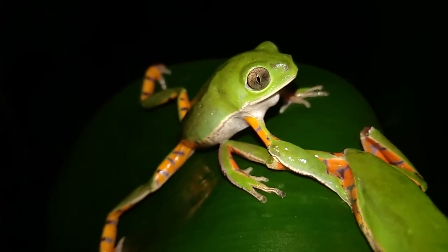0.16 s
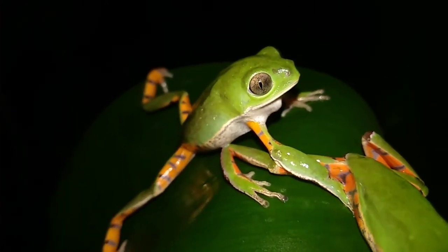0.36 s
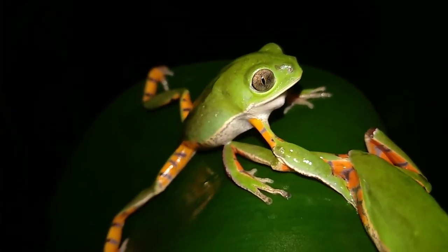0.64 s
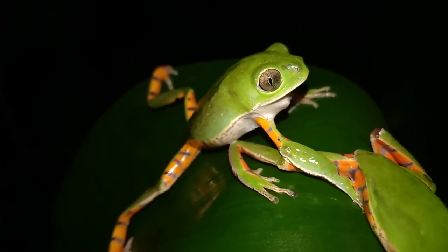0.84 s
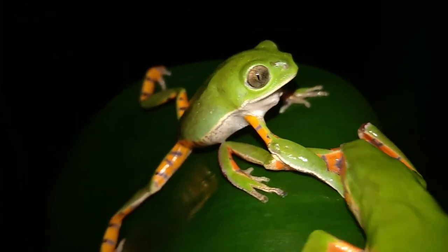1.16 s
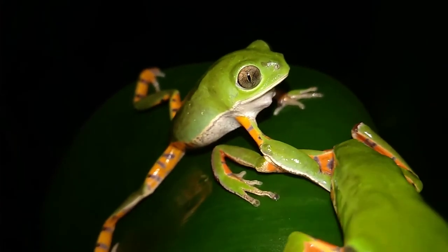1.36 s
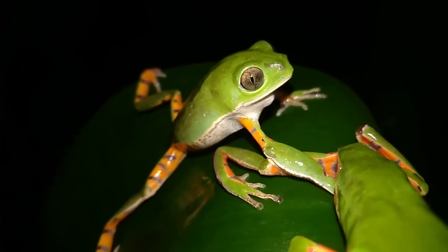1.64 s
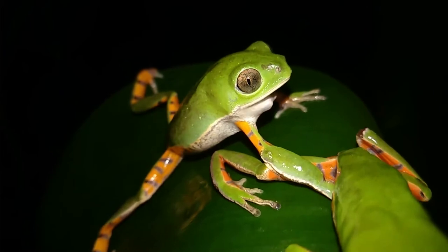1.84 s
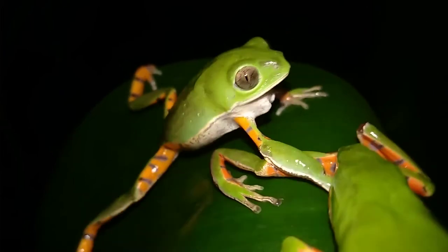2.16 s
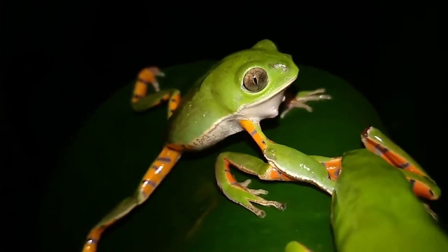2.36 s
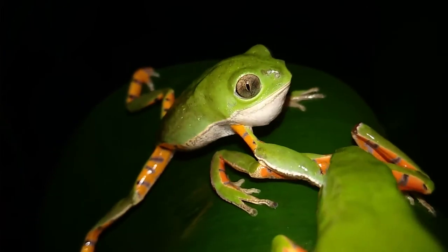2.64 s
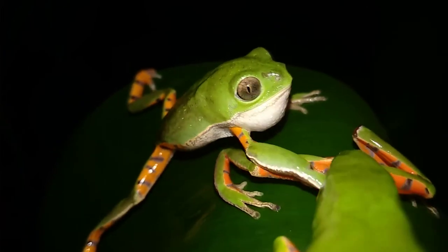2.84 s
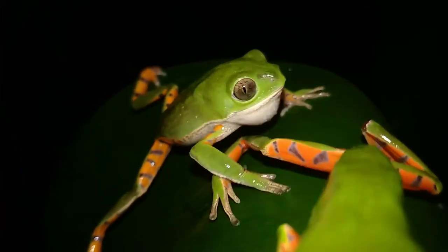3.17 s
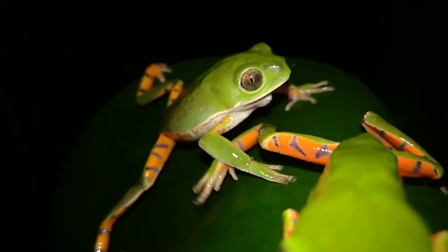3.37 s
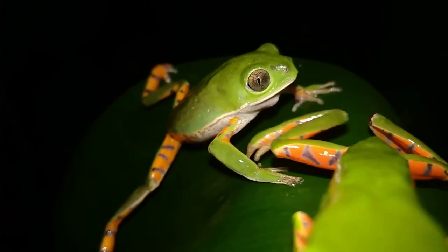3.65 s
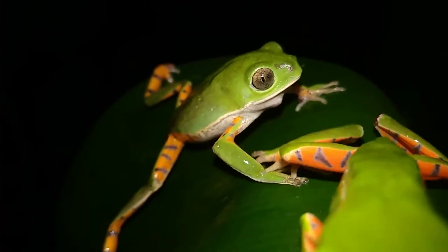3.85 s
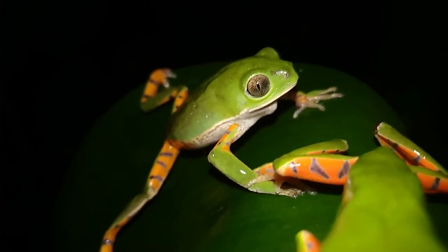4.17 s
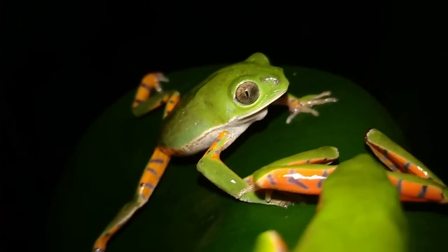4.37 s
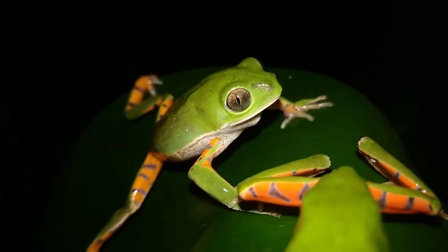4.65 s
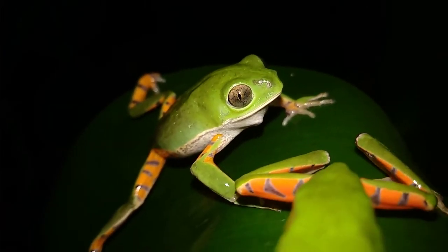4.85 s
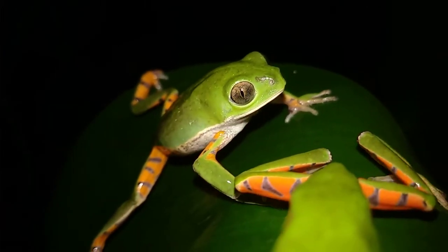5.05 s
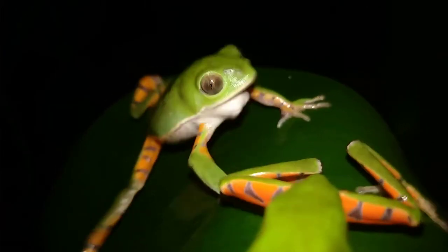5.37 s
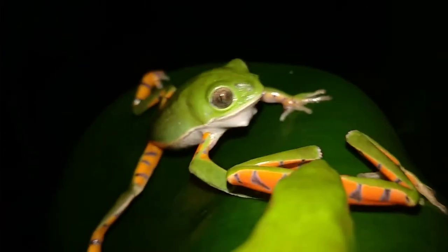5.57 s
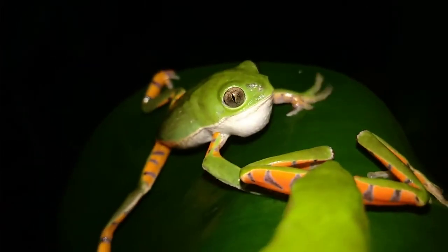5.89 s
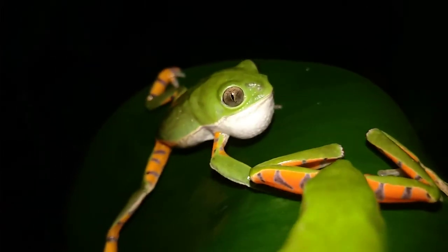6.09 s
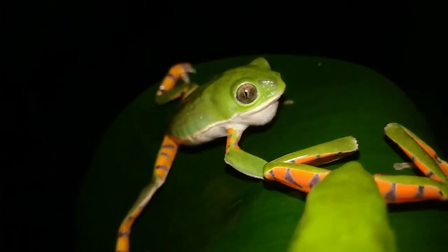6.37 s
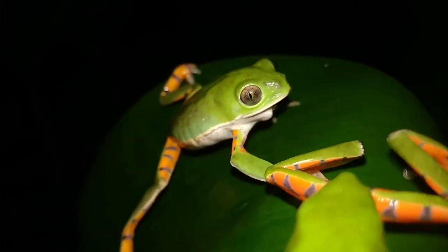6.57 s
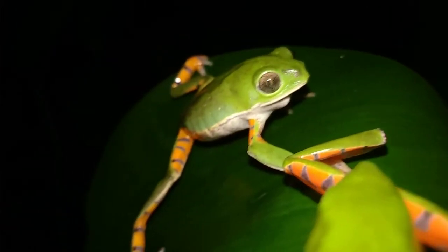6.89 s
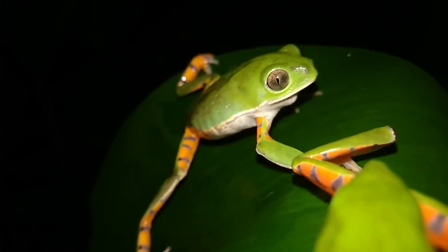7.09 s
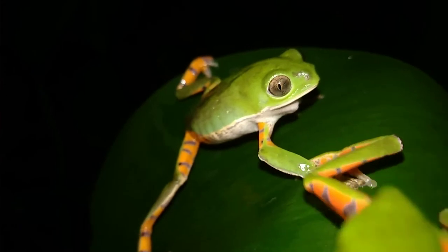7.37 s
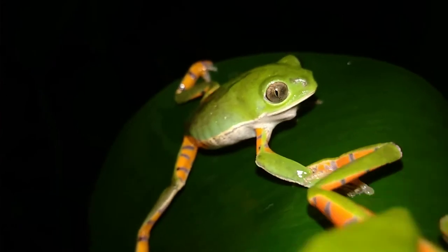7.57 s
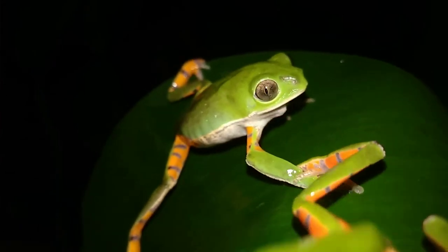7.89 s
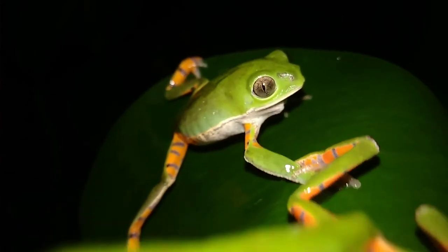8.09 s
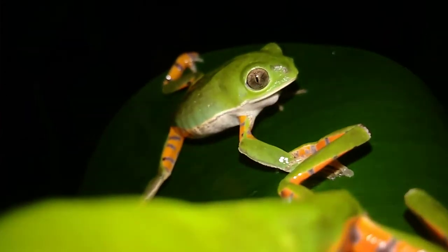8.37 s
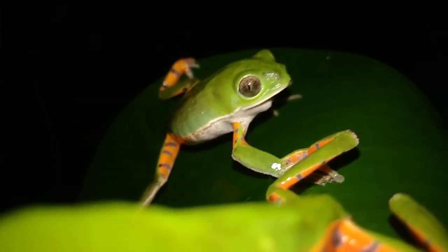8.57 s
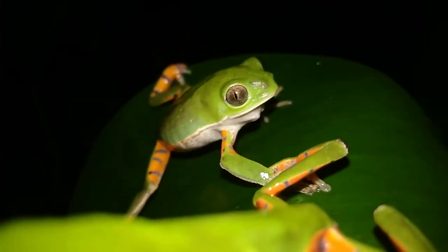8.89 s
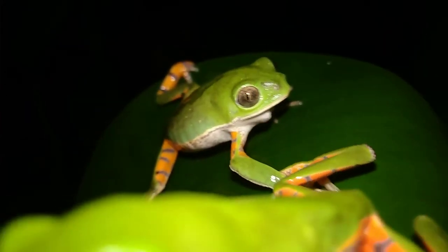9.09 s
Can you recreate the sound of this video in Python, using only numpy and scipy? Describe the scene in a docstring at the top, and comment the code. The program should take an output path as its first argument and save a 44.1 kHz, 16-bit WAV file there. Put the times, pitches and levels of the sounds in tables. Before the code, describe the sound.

A nearby frog repeats short rattling croaks, each a quick run of hollow tones cut off by sharp snaps, roughly every seven tenths of a second. Two longer, quickening trills swell up on the right. Very soft leaf bumps and rustles follow the first. Behind them are shrill continuous crickets, a pulsing airy katydid to the left, blurred far frogs and quiet night rumble, in wide outdoor stereo with leafy reflections.

```python
"""A cricket drone near 7 kHz, a katydid's hissing swells on the left and a low rumble open a night at a pond.
Far frogs call through diffuse echoes; a frog close by croaks eleven times in runs of swelling tones and snaps.
A second frog, on the right, gives two long trills of clicks that ring throat and vocal sac; a leaf rustles.
Insects are stroke pulses, a sine and filtered noise; foliage adds delayed copies and decaying noise echoes."""
import sys
import numpy as np
from scipy import signal
from scipy.fft import rfft, irfft, next_fast_len
from scipy.io import wavfile

SR = 44100
rng = np.random.default_rng(int(sys.argv[2]) if len(sys.argv) > 2 else 0)


def wav_out(sig):
    """Save sig, one row per channel (or a flat mono array), as 16-bit PCM at SR to the path in sys.argv[1]."""
    wavfile.write(sys.argv[1], SR, np.round(np.clip(np.atleast_2d(sig).T, -1, 1) * 32767).astype(np.int16))


N = 407043
TIME = np.arange(N) / SR  # s

# Spectrum of the night air. Each row: frequency in Hz, relative level in dB.
NIGHT_SPECTRUM = [(15, -41), (25, -26.5), (54, 3), (179, -5), (269, -11.5), (295, -13.5), (485, -10.5),
                  (746, -15.5), (895, -18.5), (1380, -22.5), (2420, -20.5), (2650, -10.5), (4270, -21),
                  (5000, -27.5), (5600, -12.5), (7280, -74.5), (12300, -120)]
# Pace of the nearest cricket before its wander. Each row: time in seconds, wing strokes per second.
CRICKET_PACE = [(0, 157.3), (1.2, 156.5), (2.6, 156), (3.6, 156.4), (4.4, 158.4), (5.4, 159.3),
                (6.4, 158.7), (7.6, 157.2), (9.2, 156)]
# Resonance band of cricket wings. Each row: frequency in Hz, relative level in dB.
CRICKET_SPECTRUM = [(3290, -57), (5600, -34), (5760, -13.5), (6450, 6), (6620, 2), (6860, 4), (7150, 2.5),
                    (7640, 3.5), (8190, -22.5), (8400, -43.5), (10900, -50), (18500, -120)]
# Katydid swells. Each row: start in seconds, length in seconds, level in dB before the mix.
KATYDID_SWELLS = [(-.03, 0.59, -45.5), (0.693, 0.62, -46), (1.42, 0.46, -46), (2.022, 0.67, -46),
                  (2.805, 0.5, -44.5), (3.39, 0.44, -46), (3.994, 0.41, -46), (4.606, 0.5, -50),
                  (5.153, 0.59, -46), (5.83, 0.63, -46), (6.571, 0.49, -47), (7.202, .58, -46.5),
                  (7.944, 0.62, -47), (8.747, 0.52, -47)]
# Band of the katydid's rasp. Each row: frequency in Hz, relative level in dB.
KATYDID_SPECTRUM = [(8000, -19.5), (9500, -26.5), (10700, -13.5), (11500, -2.5), (12600, 3.5), (13900, -2),
                    (14700, -18.5), (15600, -28.5)]
# Far frogs with a rising chirp, with a falling squeak, and with a croak. Each entry: start in seconds.
CHIRP_STARTS = [0.549, 1.17, 1.863, 2.448, 3.59, 4.129, 4.808, 5.649, 6.259, 6.769, 7.139, 7.639, 8.649,
                9.11]
SQUEAK_STARTS = [.28, 6.825, 9.165]
FAR_CROAK_STARTS = [0, 1.37, 1.87, 3.52, 4.37, 6.82, 7.92]
# Near croaks. Each row: start in seconds, pulses per second, pulse count,
# snap level in dB at full effort, before the foliage.
CROAK_RUNS = [(0.1631, 51.5, 5, -4), (.7992, 58, 7, -7.5), (1.5119, 55, 7, -6.5), (2.1829, 50.8, 7, -5.5),
              (3.1492, 52.5, 8, -5.5), (3.8511, 52.9, 8, -4), (4.5174, 52.9, 9, -5.5),
              (5.1999, 52.9, 9, -6), (6.418, 53.8, 9, -6.5), (7.2928, 53.4, 9, -6.5), (8.1352, 53, 8, -7)]
# Paths from the croaking frog to each channel, straight and off leaves.
# Each row: delay in seconds, gain of the lows, gain of the highs.
LEFT_PATHS = [(0, 0.76, .14), (.0014, 0.22, 0.66), (.0028, -0.12, 0.12), (.0074, 0.26, .3),
              (.0085, .08, .16), (0.015, 0.06, .1)]
RIGHT_PATHS = [(0, 0.64, 0.4), (.0011, .1, .44), (.0061, .08, .26), (.0074, .12, .16), (0.013, .06, .1)]
# Colour that the foliage gives the croaks. Each row: frequency in Hz, gain in dB.
FOLIAGE_COLOUR = [(300, -2), (600, -10), (730, 23), (850, -1.5), (1000, 2), (1200, -4.5), (1400, 0),
                  (1700, -0.5), (2200, 3), (2900, -2.5), (3400, -2), (4200, -10.5), (5200, -18.5),
                  (8000, -19)]
# Trills. Each row: start in seconds, length in seconds, first pulses per second, full pulses per second,
# time to the crest in seconds, crest level in dB before a 4 dB lift, sag after the crest in dB,
# growth of the sac resonance in dB, throat tuning at the start as a factor.
TRILL_CALLS = [(2.299, .805, 99, 117.5, 0.24, -30.5, 4, 6.5, 0.93),
               (5.458, 0.812, 89, 121, 0.41, -26.5, 1.5, 6, 0.93)]
# Throat resonances of one trill click. Each row: frequency in Hz before tuning,
# rise and decay constant in seconds, relative level in dB.
THROAT_MODES = [(2099, 0.00056, 7), (2650, 0.00054, -54), (3900, 0.00036, -12), (5720, 0.00013, -16)]
# Leaf rustles, then soft bumps. Each row: start in seconds, length in seconds, level in dB.
LEAF_RUSTLES = [(3.134, .043, -58), (3.216, 0.093, -56), (3.335, .077, -57.5), (3.51, 0.033, -58),
                (3.666, 0.059, -55)]
LEAF_BUMPS = [(2.72, 0.14, -60), (2.91, 0.054, -56), (3.189, 0.18, -54), (3.391, 0.076, -60.5),
              (3.786, .065, -58.5), (7.388, .066, -56)]

NIGHT_DB = -61
DRONE_HZ, DRONE_DB = 173.6, -66  # faint far motor, before its wander
DRONE_START_S, DRONE_LENGTH_S, DRONE_ATTACK_S, DRONE_RELEASE_S = -0.31, 5.74, 2.7, 1
WING_CYCLES = 44  # wing vibrations per stroke period
SWELL_ATTACK_S, SWELL_RELEASE_S = 0.17, 0.25  # katydid
CROAK_HZ, TONE_DB, SWELL_S = 989, -17.5, 0.0072  # low tone of a croak pulse at full effort, before its bend
RISE_PULSES, FALL_PULSES = 2.54, 2.52  # pulses over which the effort builds up and lets go
TONE_POWER, SNAP_POWER = 0.39, 1.15  # both grow as a power of the effort
HUDDLE_S = 0.002288  # the first and last pulses lie closer to their neighbours
TRILL_ATTACK_S, TRILL_RELEASE_S = 0.013, 0.022
TRILL_SOFT_DB, TRILL_SAG_S = -36, 0.5  # level before the swell and the 4 dB lift; time of the sag
SPEED_UP_S = 0.21  # the clicks reach their full rate in about twice this time
TIGHTEN_PER_S = 0.058  # rise of the throat tuning
STRAY = 0.037  # spread of a resonance at 4 kHz, as a share of its pitch
SAC_EMPTY_DB = -14  # sac resonance against the throat before the sac fills
RUSTLE_HZ, BUMP_HZ = 10060, 441
TOP_HZ = 15600


def undb(db):
    """Logarithmic level: decibels become an amplitude gain."""
    return 10 ** (np.asarray(db) / 20)


def unit(x):
    """Power normalisation: scale to an rms of one."""
    return x / np.sqrt(np.mean(x ** 2) + 1e-18)


def pan(left_db):
    """Interaural level difference: gains of both channels for a left-minus-right level in dB."""
    return undb(np.array([[left_db], [-left_db]]) / 2)


def curve(rows, at, axis=1):
    """Linear interpolation: one column of a table, joined by straight lines."""
    rows = np.array(rows)
    return np.interp(at, rows[:, 0], rows[:, axis])


def walk(rate):
    """Slow random modulation: normal draws, `rate` per second, joined by straight lines."""
    knots = rng.standard_normal(int(N / SR * rate) + 2)
    return np.interp(TIME * rate, np.arange(len(knots)), knots)


def envelope(age, length, attack, release):
    """Amplitude envelope: straight attack, hold at one, straight release."""
    return np.clip(np.minimum(age / attack, (length - age) / release), 0, 1)


def ease(share):
    """Sine-squared transition: a smooth step from zero to one."""
    return np.sin(np.pi / 2 * np.clip(share, 0, 1)) ** 2


def colour(x, points):
    """Linear filtering: multiply the spectrum by (Hz, dB) points joined over log frequency."""
    hz, db = np.transpose(points)
    size = next_fast_len(x.shape[-1] + 2048)
    f = np.maximum(np.arange(size // 2 + 1) * SR / size, 1)
    gain = undb(np.interp(np.log(f), np.log(hz), db))
    return irfft(rfft(x, size) * gain, size)[..., :x.shape[-1]]


def add(out, start, sound):
    """Superposition: mix a sound in at a time in seconds, trimmed to the scene."""
    i = int(round(start * SR))
    sound = sound[..., max(-i, 0):max(N - max(i, -N), 0)]
    out[..., max(i, 0):max(i, 0) + sound.shape[-1]] += sound


def scatter(x, t60):
    """Diffuse scattering by vegetation: convolve with noise that falls 60 dB in t60, different per channel."""
    t = np.arange(SR) / SR
    tail = rng.standard_normal((2, SR)) * undb(-60 * t / t60)
    tail /= np.sqrt(np.sum(tail ** 2, axis=1, keepdims=True))
    return signal.fftconvolve(np.atleast_2d(x), tail, axes=1)[:, :N]


def echoes(x, paths, axis=1):
    """Multipath propagation: sum delayed copies, with gains from one column of a table of paths."""
    return sum(path[axis] * np.interp(TIME - path[0], TIME, x, left=0) for path in paths)


def night():
    """Broadband ambience: filtered noise gives rumble and a thin haze of calls; wandering sines, hum and motor."""
    mid, side = rng.standard_normal((2, N))
    side = colour(side, [(100, -12.5), (500, -4.5), (2000, 1.5)])  # the channels differ least in the lows
    air = unit(colour(np.array([mid + side, mid - side]), NIGHT_SPECTRUM))
    air = air * undb(NIGHT_DB + 0.6 * walk(2.01))
    hum_phase = 2 * np.pi * np.cumsum(59.3 + 0.83 * walk(5.5)) / SR
    hum = undb(-67.0 + 1.2 * walk(3.3)) * np.sin(hum_phase)
    motor = envelope(TIME - DRONE_START_S, DRONE_LENGTH_S, DRONE_ATTACK_S, DRONE_RELEASE_S)
    drone_phase = 2 * np.pi * np.cumsum(DRONE_HZ + 0.566 * walk(1.94)) / SR
    drone = motor * undb(DRONE_DB + 1.5 * walk(4.88)) * np.sin(drone_phase)
    return air + hum + drone


def cricket(rate, t60, stroke_s):
    """Stridulation: each stroke drags a file of teeth and rings the wing near 7 kHz; grass smears the strokes."""
    phase = np.cumsum(rate) / SR
    from_stroke = (phase % 1 - .5) / rate  # s from the middle of the stroke
    wing = np.cos(2 * np.pi * WING_CYCLES * rate * from_stroke)
    strokes = np.exp(-(from_stroke / stroke_s) ** 2) * wing
    return unit(colour(scatter(strokes * undb(walk(60)), t60), CRICKET_SPECTRUM))


def crickets():
    """Incoherent chorus: a near cricket whose wing sings on between strokes, two further off, a blur of many."""
    rate = curve(CRICKET_PACE, TIME) + 0.0305 * walk(7.2)
    near = cricket(rate, t60=0.054, stroke_s=0.00069)
    song_phase = 2 * np.pi * WING_CYCLES * np.cumsum(rate) / SR
    song = undb(-57.5 + 3.5 * walk(3.5)) * np.sqrt(2) * np.sin(song_phase)
    others = cricket(153.5 + .5 * walk(0.98), t60=0.17, stroke_s=.00012)
    others = others + cricket(161 + 0.66 * walk(0.59), t60=0.12, stroke_s=0.00015)
    chorus = unit(colour(rng.standard_normal((2, N)), CRICKET_SPECTRUM)) * undb(1.5 * walk(8.1))
    close = pan(5.4) * (undb(-55.5) * near + song)
    distant = pan(0.8) * (undb(-59) * others + undb(-58.5) * chorus)
    return close + distant


def katydid():
    """Noise-like stridulation: very fine wing rasping in swells on the left, over a steady high hiss."""
    effort = sum(undb(db) * envelope(TIME - start, length, SWELL_ATTACK_S, SWELL_RELEASE_S)
                 for start, length, db in KATYDID_SWELLS)
    rasp = rng.standard_normal((2, N)) * undb(1.0 * walk(300) + 1.3 * walk(21))
    swells = undb(-8.5) * effort * unit(colour(rasp, KATYDID_SPECTRUM))
    far_band = [(5000, -24), (8500, -6.5), (10500, 2.5), (13000, -2), (15500, -12.5)]
    far = unit(colour(rng.standard_normal((2, N)), far_band))
    return pan(10.5) * swells + pan(4.8) * undb(-66) * far


def far_calls(starts, db, length_s, from_hz, to_hz, rate, sharp, rough, t60):
    """Amplitude and frequency modulation: pulsed, hoarse gliding calls, blurred by scattering over distance."""
    out, t = np.zeros(N), np.arange(int(length_s * SR)) / SR
    for start in starts:
        jitter = 0.0095 * rng.standard_normal() + rough * rng.standard_normal(len(t))
        pitch = np.geomspace(from_hz, to_hz, len(t)) * (1 + jitter)
        pulses = np.exp(sharp * np.cos(2 * np.pi * rate * t))
        arch = np.sqrt(np.abs(np.sin(np.pi * t / length_s)))
        call = arch * pulses * np.sin(2 * np.pi * np.cumsum(pitch) / SR)
        add(out, start, undb(db) * unit(call))
    return undb(-5) * out + scatter(out, t60=.04) + undb(-1.5) * scatter(out, t60)


def far_frogs():
    """Distinct carriers and pulse rates: three kinds of frog around the pond."""
    chirps = far_calls(CHIRP_STARTS, db=-58, length_s=.1, from_hz=2830, to_hz=3070,
                       rate=120, sharp=3.2, rough=.17, t60=0.8)
    squeaks = far_calls(SQUEAK_STARTS, db=-61.5, length_s=0.037, from_hz=2400, to_hz=1966,
                        rate=170, sharp=0.44, rough=0.45, t60=0.62)
    croaks = far_calls(FAR_CROAK_STARTS, db=-68.5, length_s=0.11, from_hz=920, to_hz=858,
                       rate=88, sharp=1.2, rough=.25, t60=.4)
    return pan(7) * (chirps + squeaks) + croaks


def croak_pulse(t, hz, swell_s, tone_db, snap_db, bend_hz=750, bend_s=.0009, snap_hz=3900, snap_s=0.00017):
    """Vocal-cord oscillation: a low tone swells, bends upward and is cut off by a snap at t = 0."""
    before, age = np.minimum(t, 0), np.maximum(t, 0)
    pitch = hz + bend_hz * np.exp(before / bend_s)
    phase = 2 * np.pi * np.cumsum(pitch) / SR
    phase -= np.interp(0, t, phase)
    swell = np.exp(-(np.abs(before) / swell_s) ** 3) * np.exp(-age / 0.00053)
    tone = swell * (np.sin(phase) + undb(-24) * np.sin(2 * phase) + undb(-19) * np.sin(3 * phase))
    # the snap's pitch sags as the cords go slack
    snap_wave = np.sin(2 * np.pi * snap_hz * age * (1 - age / 0.0062))
    snap = age / snap_s * np.exp(1 - age / snap_s) * snap_wave
    return undb(tone_db) * tone + undb(snap_db) * snap


def croaking_frog():
    """Pulsed phonation: effort builds and lets go over a run, and moves the snaps much more than the tones."""
    voice = np.zeros(N)
    t = np.arange(-SR // 70, SR // 200) / SR
    for start, rate, count, snap_db in CROAK_RUNS:
        count = int(round(count))
        for k, chance in enumerate(rng.standard_normal((count, 4))):
            effort_db = 20 * np.log10(envelope(k + 1, count + 1, RISE_PULSES, FALL_PULSES))
            pulse = croak_pulse(t, CROAK_HZ * (1 + 0.021 * chance[0]), SWELL_S,
                                TONE_DB + TONE_POWER * effort_db + 0.28 * chance[1],
                                snap_db + SNAP_POWER * effort_db + 1.9 * chance[2])
            huddle = HUDDLE_S * ((k == 0) - (k == count - 1))
            add(voice, start + t[0] + k / rate + huddle + .00008 * chance[3], pulse)
    voice = colour(voice, FOLIAGE_COLOUR)
    # leaves shade and mirror mostly the short waves
    highs = colour(voice, [(1200, -30), (1800, -9.5), (2400, -0.5)])
    lows = voice - highs
    near = np.array([echoes(lows, paths) + echoes(highs, paths, axis=2)
                     for paths in (LEFT_PATHS, RIGHT_PATHS)])
    bright = colour(voice, [(900, -14), (1400, 1.5), (2800, 6)])
    return near + undb(-5) * scatter(bright, t60=0.085) + undb(-24) * scatter(bright, t60=0.39)


def ring(hz, rise_s):
    """Damped resonance: it builds up quickly and dies away."""
    t = np.arange(SR // 100) / SR
    return (t / rise_s) ** 2 * np.exp(-t / rise_s) * np.sin(2 * np.pi * hz * t)


def trilling_frog(sac_hz=1560, sac_rise_s=0.00071, lag_s=0.00022):
    """Source and filter: quickening clicks ring a tightening throat, and a lower resonance as the sac fills."""
    voice = np.zeros(N)
    for (start, length, first_rate, full_rate, crest_s, crest_db,
         sag_db, fill_db, throat_tuning) in TRILL_CALLS:
        age = .002
        while age < length:
            size, gap, slack = rng.standard_normal(3)
            slow = np.exp(-(age / SPEED_UP_S) ** 2)
            swell_db = (crest_db - TRILL_SOFT_DB) * ease(age / crest_s)
            db = TRILL_SOFT_DB + swell_db - sag_db * ease((age - crest_s) / TRILL_SAG_S)
            sac_db = SAC_EMPTY_DB + fill_db * ease((age - crest_s) / (length - crest_s))
            tuning = (throat_tuning + TIGHTEN_PER_S * age) * (1 + 0.017 * slack)
            # the higher resonances stray more from click to click
            stray = rng.standard_normal(len(THROAT_MODES))
            throat = sum(undb(mode_db) * ring(hz * tuning * (1 + STRAY * (hz / 4000) ** 2 * own), rise)
                         for (hz, rise, mode_db), own in zip(THROAT_MODES, stray))
            pulse = unit(throat - undb(sac_db) * ring(sac_hz * tuning, sac_rise_s))
            # the slow first clicks are the least even
            strength = undb(db + 4 + (.7 + 1.1 * slow) * size)
            strength = strength * envelope(age, length, TRILL_ATTACK_S, TRILL_RELEASE_S)
            add(voice, start + age, strength * pulse)
            rate = full_rate + (first_rate - full_rate) * slow
            age += (1 + (0.022 + 0.029 * slow) * gap) / rate
    # the left channel hears it later, softer and thinner, with the upper overtones least weakened
    left = colour(echoes(voice, [(lag_s, 1), (.0031, .3)]),
                  [(700, -17), (1300, -7), (2300, -18.5), (4400, 0.5)])
    right = echoes(voice, [(0, 0.9), (.0021, 0.18)])
    leaves = undb(-21) * scatter(voice, t60=.05)
    return np.array([left, right]) + leaves + undb(-20.5) * scatter(voice, t60=0.22)


def brushes(events, hz):
    """Granular friction: short grainy bursts of noise from leaves, centred on one frequency."""
    out = np.zeros((2, N))
    band = [(hz / 4, -30), (hz * 0.97, -5), (hz, 0), (hz * 1.05, -5), (hz * 2, -24)]
    for start, length, db in events:
        size = int(length * SR)
        grains = rng.standard_normal((3, size)) * undb(2 * rng.exponential(size=size))
        grains = grains * np.sqrt(np.hanning(size))
        both = grains[:2] / 2 + grains[2]  # most of it reaches both channels alike
        add(out, start, undb(db) * unit(colour(both, band)))
    return out


def rustles():
    """Contact noise: a climbing frog bumps the leaf at low frequency and rustles it at high frequency."""
    return brushes(LEAF_RUSTLES, RUSTLE_HZ) + brushes(LEAF_BUMPS, BUMP_HZ)


def scene():
    """Superposition: everything that sounds around the pond adds up."""
    insects = crickets() + katydid()
    frogs = far_frogs() + croaking_frog() + trilling_frog()
    return night() + insects + frogs + rustles()


def record(dry):
    """Band limiting: a steep elliptic low-pass removes what lies above TOP_HZ."""
    return signal.sosfilt(signal.ellip(10, .2, 80, TOP_HZ, fs=SR, output="sos"), dry)


dry = scene()
out = record(dry)
wav_out(out)
```